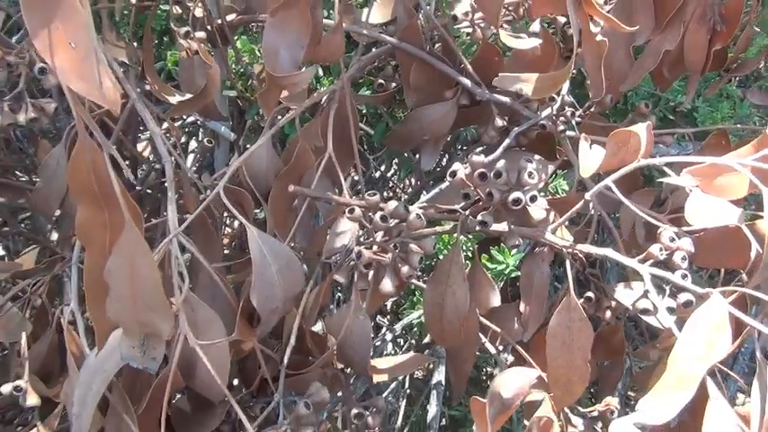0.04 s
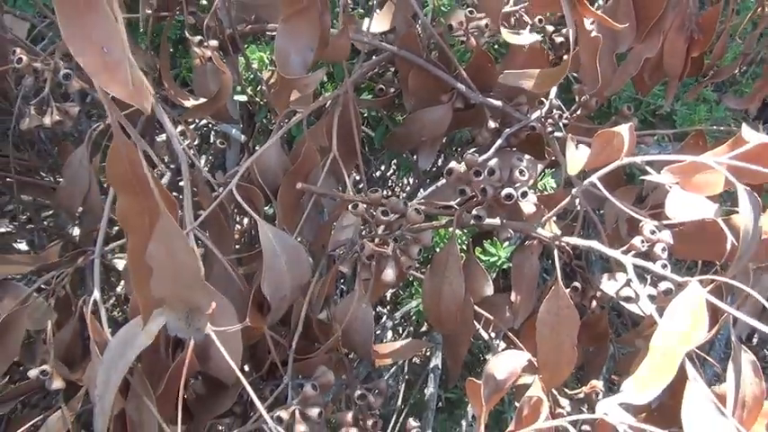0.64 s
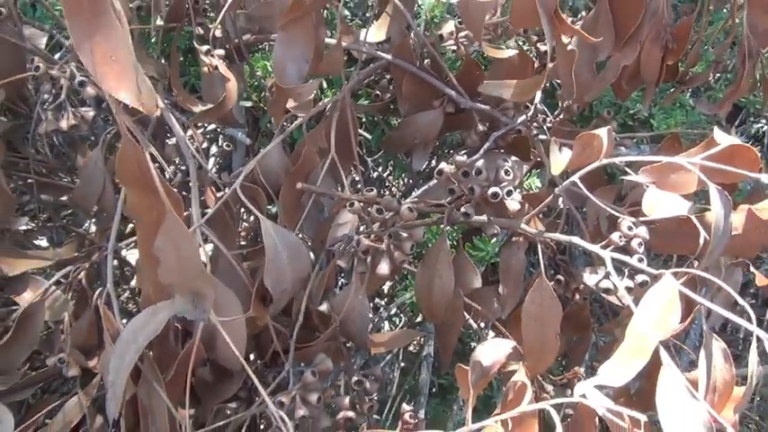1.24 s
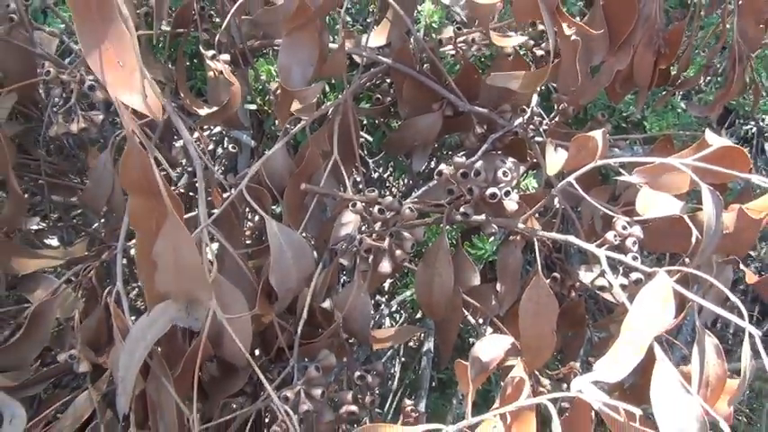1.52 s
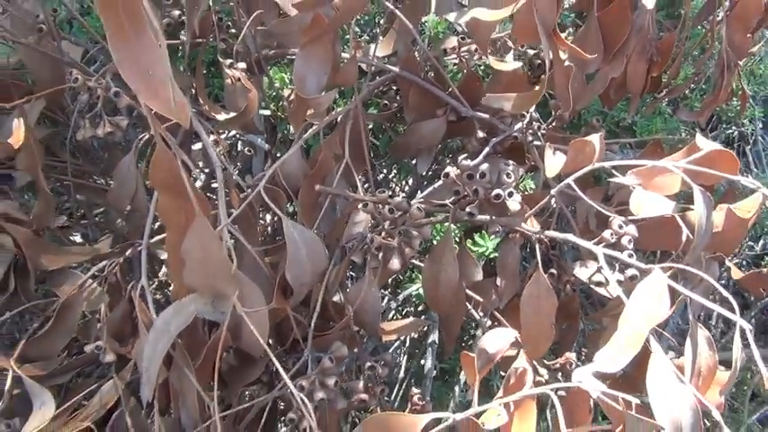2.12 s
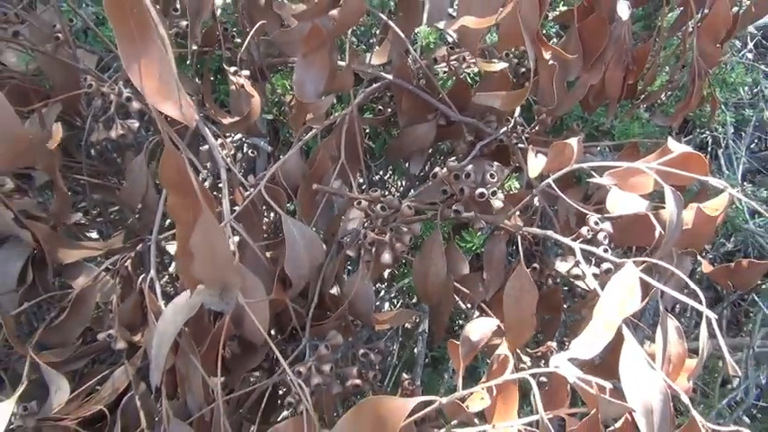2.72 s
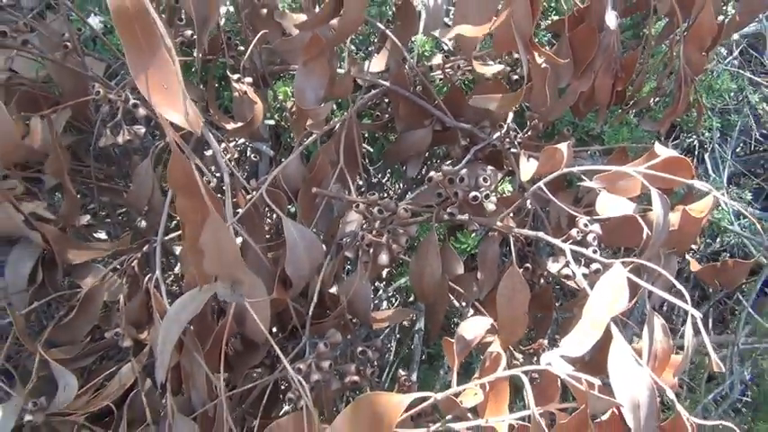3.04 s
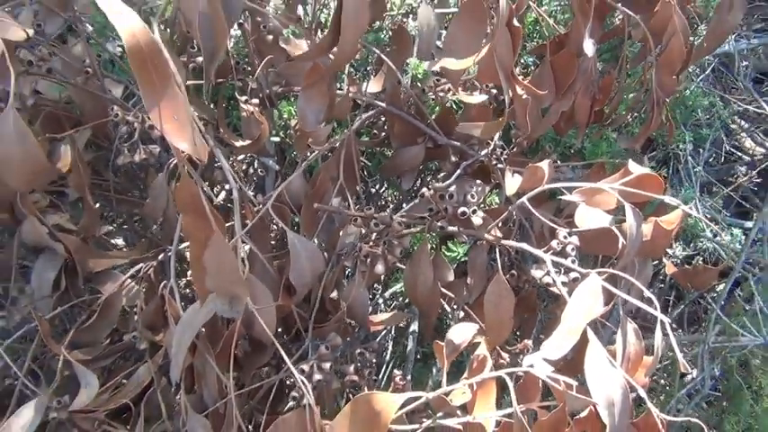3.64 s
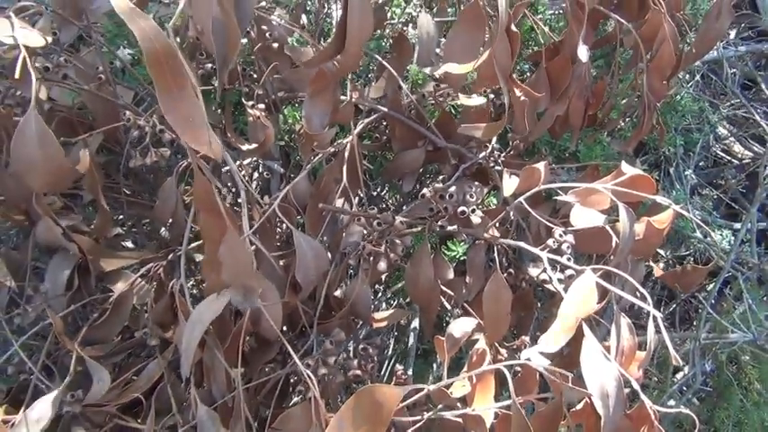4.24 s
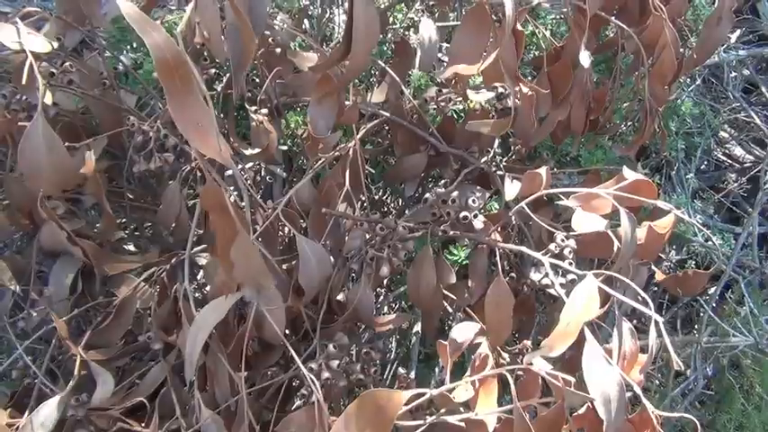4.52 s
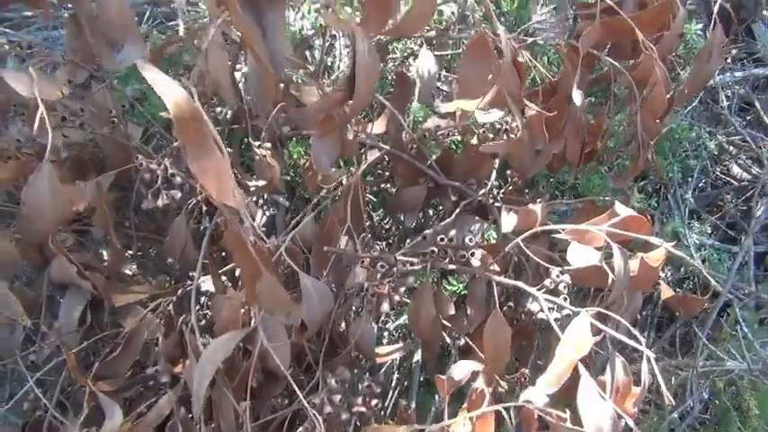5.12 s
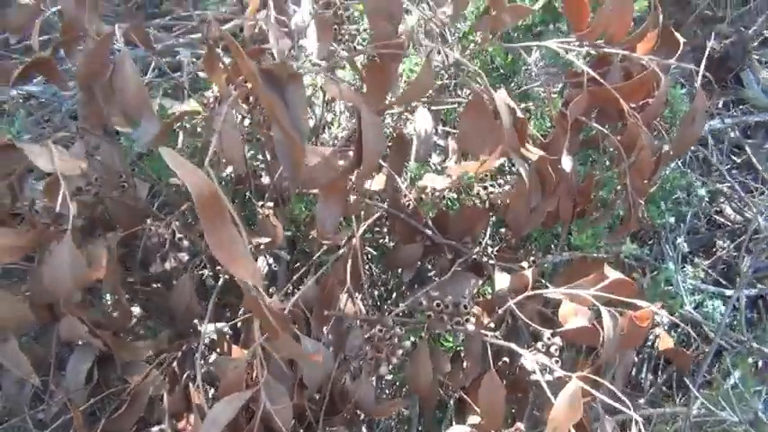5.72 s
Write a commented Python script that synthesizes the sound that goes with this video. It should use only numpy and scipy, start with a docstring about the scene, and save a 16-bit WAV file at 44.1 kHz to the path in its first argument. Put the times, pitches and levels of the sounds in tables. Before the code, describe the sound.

A steady, low distant rush runs throughout, outdoors among trees. Right from the start a bird gives five reedy, slightly raspy whines, nearly three a second, each sliding upward and ending in a quick downward flick. They finish at about 1.7 seconds and ring briefly among the trunks. Other birds answer very faintly from far off, at around 1.3, 2.3 and 3 seconds. Dry leaves tick lightly now and then from 0.7 seconds, with a small crackle near 3.4. Soft, dull bumps on the hand-held microphone cluster between 3 and 4 seconds, with a few more later. From 4 seconds to about 5.8 the bird gives six shorter, higher rising yelps, about three a second, each cracking into a thin whistled squeak. A faint hum comes in at about 5.7 seconds and swells slightly at the very end.

```python
"""Bird calling over leaf litter

A bird in the trees gives five reedy, rising whines, pauses, then six yelps that break up into a squeak.
Trunks and foliage scatter the calls; other birds answer faintly from far off. Dry leaves tick,
the hand-held microphone bumps softly, and a faint hum sets in late over a steady distant rush."""
import sys
import numpy as np
from scipy import signal
from scipy.fft import rfft, irfft
from scipy.io import wavfile
from scipy.ndimage import uniform_filter1d

SR = 44100
rng = np.random.default_rng(int(sys.argv[2]) if len(sys.argv) > 2 else 0)


def transcribe(u):
    """Save the signal u as a 16-bit wav file named by the first command-line argument.

    u: samples, shape (n,) or (channels, n), limited to [-1, 1]; the rate is SR.
    q: integer samples, one column per channel.
    """
    v = np.clip(np.atleast_2d(u).T, -1, 1)
    q = np.round(v * 32767).astype(np.int16)
    wavfile.write(sys.argv[1], SR, q)


N = 262836
TIME = np.arange(N) / SR

# Low register. Each row: start and time to the top in seconds, shelf and top pitch in Hz, time to the
# steepest climb and its half width in seconds, then in dB the drive of the fundamental, second harmonic
# and higher harmonics, and the swell over the climb.
WHINE_NOTES = [(0.0, 0.17, 1451, 2195, 0.099, 0.05, -35.5, -24, -28.5, 6.5),
               (0.363, .168, 1492, 2140, 0.098, 0.04, -32, -30.5, -33.5, 4.5),
               (0.73, .174, 1474, 2160, 0.1, 0.052, -30.5, -27.5, -29.5, 5.5),
               (1.113, .177, 1486, 2124, .095, .044, -32.5, -29, -32, 3.5),
               (1.527, .16, 1348, 2084, .083, .054, -33.5, -30, -37.5, 15)]
# Middle register. Each row: start in seconds, start and top pitch in Hz, time to the steepest climb and
# its half width in seconds, then drive, swell and overtone offset in dB.
YELP_NOTES = [(4.036, 2123, 2794, .005, 0.047, -32.5, -6, -18),
              (4.329, 2214, 2900, 0.023, 0.03, -33, -0.5, -17),
              (4.62, 2200, 2942, 0.028, 0.032, -32.5, -2, -17.5),
              (4.973, 2460, 3340, 0.042, 0.024, -32.5, -0.5, -9.5),
              (5.314, 2407, 3460, .045, 0.0313, -30.5, -1.5, -13),
              (5.696, 2385, 3177, 0.034, 0.015, -34.5, 7, -14)]
# Top register, one per yelp. Each row: start and length in seconds, start and end pitch in Hz,
# mid-note level and swell in dB.
SQUEAK_NOTES = [(4.075, 0.018, 4130, 4620, -33.5, -10), (4.393, 0.05, 4107, 4550, -28, -5),
                (4.712, 0.066, 4320, 4950, -24, -2.5), (5.076, 0.031, 4534, 4830, -24, 1),
                (5.42, 0.024, 4833, 4967, -23.5, -6), (5.785, 0.038, 4580, 4760, -29.5, -8)]
# Throat resonances that a whine's harmonics sweep through. Each row: frequency in Hz, gain in dB.
WHINE_THROAT_EQ = [(1300, -5), (1520, -10), (1700, -6.5), (2120, -3), (2600, -2.5), (3050, -10),
                   (3400, -14.5), (3850, -5.5), (4280, -2), (4500, -8), (5000, 1), (5500, -10.5),
                   (6050, -19.5), (6500, -18.5), (7300, -9), (8050, -21.5), (8600, -20.5)]
# Peaks and dips a yelp sweeps through, from the voice and the ground reflection.
# Each row: frequency in Hz, gain in dB.
YELP_COLOUR_EQ = [(2200, -4.5), (2450, 0.5), (2600, -11), (2830, 3.5), (3020, -4), (3250, 2), (4400, -1),
                  (4800, 5), (5150, 2), (5550, -4), (6150, 3), (6900, -3.5)]
# How the beak radiates the upper overtones. Each row: frequency in Hz, gain in dB.
BEAK_EQ = [(5000, 14), (7300, -3), (8600, -1), (9400, -8), (10100, -5.5), (11600, -3), (13000, -12),
           (15500, -20)]
# Far yelps. Each row: start and length in seconds, start and top pitch in Hz, drive of the fundamental
# and second harmonic in dB.
FAR_YELP_NOTES = [(2.305, .055, 2580, 2950, -60, -58.5), (2.945, .062, 2260, 2980, -54.5, -55)]
# Another bird's husky, falling notes. Each row: start and length in seconds, start and end pitch in Hz,
# drive in dB.
FAR_CHIRP_NOTES = [(1.321, .048, 1817, 1627, -39.5), (3.025, 0.02, 2300, 2170, -45.5),
                   (3.055, 0.0556, 1875, 1584, -47)]
# First reflections off the ground and near branches. Each row: delay in seconds, gain in dB.
EARLY_ECHOES = [(.0045, -38), (.011, -13)]
# Dry leaves ticking. Each row: start in seconds, dry peak in dB, low and high band edge in Hz.
LEAF_TICKS = [(0.717, -38, 3026, 12940), (1.402, -39, 3000, 11960), (1.631, -32, 4040, 11250),
              (2.273, -36, 5000, 12000), (2.279, -29.5, 5900, 9600), (2.387, -36.5, 3000, 9500),
              (2.94, -41, 2200, 4800), (3.4215, -35, 7070, 12500), (3.4445, -33, 1780, 9300),
              (3.4517, -26, 1800, 7500)]
# Leaves brushing. Each row: centre and half width in seconds, dry level in dB, low band edge in Hz.
LEAF_BRUSHES = [(0.72, 0.009, -53, 3980), (0.792, 0.0069, -40, 790), (2.279, 0.0051, -48, 3180),
                (3.401, 0.0065, -50, 1780), (3.437, 0.019, -46.5, 700)]
# The hand nudging the microphone. Each row: start in seconds, strength in dB, pitch in Hz.
HAND_BUMPS = [(3.109, -51, 110), (3.214, -46, 100), (3.255, -46, 90), (3.325, -43, 140), (3.429, -38, 161),
              (3.452, -47, 96), (3.666, -48, 90), (3.822, -42, 115), (3.842, -39, 170), (3.904, -44, 106.6),
              (4.446, -45, 129), (5.06, -45, 111), (5.737, -45, 98)]
# Tone colour of the distant rush. Each row: frequency in Hz, relative gain in dB.
RUSH_EQ = [(15, -60), (28, -33), (70, -13), (165, -9.5), (340, -5.5), (500, -5), (950, -3.5), (1250, -6.5),
           (1500, -7), (3500, -11.5), (6700, -17.5), (10000, -23.5), (14000, -26), (15600, -33)]
# Droning bands within the rush. Each row: centre and width in Hz, level in dB.
DRONE_BANDS = [(346.8, 4.6, -70), (630, 57, -61), (918, 50, -60), (1214, 38, -57.5)]

BREAK_GAP_S = .0008  # the voice stops this long between yelp and squeak


def whine(s, top_s, shelf_hz, top_hz, steep_s, width_s, first_db, second_db, higher_db, swell_db):
    """Scoop, shelf, climb and a downward flick; each harmonic flares as it crosses a throat resonance."""
    scoop_depth, overshoot_s, settle_s = .174, .03, .013
    flick_s, flick_drop, flick_fade_db = .019, .477, -15
    overtone_db, tilt_db, brighten_db = -22, 2.3, 11.5
    t = ages(top_s + flick_s)
    scoop = 1 - scoop_depth * np.exp(-t / settle_s) * np.cos(np.pi * t / overshoot_s)
    climb = rise(t, top_s, steep_s, width_s)
    flick = progress(t - top_s, flick_s) ** 2
    hz = (shelf_hz + (top_hz - shelf_hz) * climb) * scoop * (1 - flick_drop * flick)
    effort = onset(t, length_s=.02, soft_db=-13) + swell_db * (climb - 1) + flick_fade_db * flick
    drives = (first_db, second_db, higher_db, higher_db)
    low = [db + effort + at_hz(WHINE_THROAT_EQ, k * hz) for k, db in enumerate(drives, 1)]
    top = higher_db + overtone_db + effort
    sheen = brighten_db * (climb - 1)  # the top end opens up over the climb
    high = [top + tilt_db * (k - 5) + at_hz(BEAK_EQ, k * hz) + (k > 5) * sheen for k in range(5, 10)]
    rasp = .0035 * (1 + 3.2 * np.sin(np.pi * climb) ** 2)  # roughest in mid-climb
    return note(s, hz, low + high, jitter=rasp, jitter_hz=700, flutter_db=2.17, edge_s=.0026)


def whines():
    """The low register is reedy and a little raspy, with a hiss of air that follows the voice."""
    voice = sum(whine(*row) for row in WHINE_NOTES)
    strength = uniform_filter1d(np.abs(voice), size=500)
    air = rms_one(band(rng.standard_normal(N), 5500, 16600))
    return voice + from_db(-35) * strength * air


def yelp(s, start_hz, top_hz, steep_s, width_s, db, swell_db, overtone_db, break_s):
    """A quick S-shaped rise that sweeps through peaks and dips until the voice breaks."""
    tilt_db = -2.5  # per harmonic
    t = ages(break_s - BREAK_GAP_S - s)
    hz = start_hz + (top_hz - start_hz) * rise(t, t[-1], steep_s, width_s)
    effort = db + onset(t, length_s=.028, soft_db=-15.5) + swell_db * (t / t[-1] - .5)
    low = [effort + at_hz(YELP_COLOUR_EQ, k * hz) for k in (1, 2)]
    high = [effort + overtone_db + tilt_db * (k - 4) + at_hz(BEAK_EQ, k * hz) for k in range(3, 6)]
    return note(s, hz, low + high, jitter=.0037, jitter_hz=500, flutter_db=.94, edge_s=.002)


def squeak(s, length_s, start_hz, end_hz, db, swell_db, overtone_db=-18):
    """A nearly pure whistle that slides upward, faster toward its end."""
    share = progress(ages(length_s), length_s)
    hz = start_hz + (end_hz - start_hz) * share ** 1.32
    effort = db + swell_db * (share - .5)
    high = [effort + overtone_db + at_hz(BEAK_EQ, k * hz) for k in (2, 3)]
    return note(s, hz, [effort] + high, jitter=.001, jitter_hz=400, flutter_db=.5, edge_s=.0019)


def breaking_yelps(crack_db=-9):
    """The voice flips register from each yelp into its squeak with a tiny crack."""
    yelps = sum(yelp(*row, break_s=after[0]) for row, after in zip(YELP_NOTES, SQUEAK_NOTES))
    squeaks = sum(squeak(*row) for row in SQUEAK_NOTES)
    cracks, t = np.zeros(N), TIME[:SR // 100]
    for s, _, _, _, db, _ in SQUEAK_NOTES:
        crack = band(rng.standard_normal(len(t)) * np.exp(-t / .0022), 3900, 10600)
        add(cracks, s - BREAK_GAP_S / 2, from_db(db + crack_db) * crack)
    return yelps + squeaks + cracks


def far_birds():
    """Faint answers, their upper overtones lost on the way."""
    out = np.zeros(N)
    for s, length, start_hz, top_hz, db, octave_db in FAR_YELP_NOTES:
        hz = start_hz + (top_hz - start_hz) * rise(ages(length), length, length / 2, length / 2)
        out += note(s, hz, [db, octave_db], jitter=.016, jitter_hz=400, flutter_db=3.5, edge_s=.0054)
    for s, length, start_hz, end_hz, db in FAR_CHIRP_NOTES:
        hz = start_hz + (end_hz - start_hz) * ages(length) / length
        out += note(s, hz, [db], jitter=.055, jitter_hz=348, flutter_db=3, edge_s=.0025)
    return out


def woods(x, spray_db, spray_s, body_db, treble_db, t60, treble_t60):
    """Two early echoes, a quick spray off the foliage, then a tail from the trunks that dulls as it dies."""
    t = TIME[:SR]
    spray = rng.standard_normal(SR) * t * np.exp(-t / spray_s)
    scatter = rng.standard_normal(SR) * (1 - np.exp(-t / .012))
    body = band(scatter, 600, 6500) * from_db(-60 * t / t60)
    treble = band(scatter, 7500, 14500) * from_db(-60 * t / treble_t60)
    layers = (spray_db, spray), (body_db, body), (treble_db, treble)
    response = sum(from_db(db) * rms_one(layer) for db, layer in layers) / np.sqrt(SR)
    for delay, db in EARLY_ECHOES:
        response[round(delay * SR)] += from_db(db)
    return signal.fftconvolve(x, response)[:N]


def leaves(grain_spread_db=4.5):
    """A dry leaf snaps in a millisecond; brushing is a cloud of tiny snaps."""
    out, t = np.zeros(N), TIME[:SR // 50]
    for s, db, low_hz, high_hz in LEAF_TICKS:
        snap = band(rng.standard_normal(len(t)) * np.exp(-t / .0012), low_hz, high_hz)
        add(out, s, from_db(db) * snap / np.abs(snap).max())
    grains = rng.standard_normal(N) * from_db(grain_spread_db * rng.standard_normal(N))
    for s, width_s, db, low_hz in LEAF_BRUSHES:
        swell = np.exp(-((TIME - s) / width_s) ** 2 / 2)
        out += from_db(db) * swell * rms_one(band(grains, low_hz, 5 * low_hz, order=1))
    return out


def hand_bumps():
    """Each bump rocks the microphone for a cycle or two: a soft, dull thud."""
    out, t = np.zeros(N), TIME[:SR // 10]
    age = t / .0024  # the push peaks at 2.4 ms
    for s, db, hz in HAND_BUMPS:
        add(out, s, from_db(db) * age * np.exp(1 - age) * np.sin(2 * np.pi * hz * t))
    return band(out, 48, 570)


def distant_rush(level_db=-48):
    """A steady bed of dark noise with a few droning bands."""
    hz = np.arange(N // 2 + 1) * SR / N
    spectrum = rfft(rng.standard_normal(N)) * from_db(at_hz(RUSH_EQ, hz))
    drones = sum(from_db(db) * rms_one(resonance(rng.standard_normal(N), centre, width))
                 for centre, width, db in DRONE_BANDS)
    return from_db(level_db) * rms_one(irfft(spectrum, N)) + drones


def hum(start_s=5.735, pitch_hz=606, level_db=-53, octave_db=-24):
    """A faint tone that sets in late, then grows louder and brighter."""
    swell_s, swell_db_per_s, brighten_db_per_s = 5.89, 79, 230
    late = np.maximum(TIME[TIME >= start_s] - swell_s, 0)
    db = level_db + swell_db_per_s * late
    levels = [db, db + octave_db + brighten_db_per_s * late]
    hz = np.full(len(late), pitch_hz)
    return note(start_s, hz, levels, jitter=.0074, jitter_hz=40, flutter_db=1.5, edge_s=.012)


def note(s, hz, levels, jitter, jitter_hz, flutter_db, edge_s):
    """One note at time s, with a level in dB for each harmonic; jitter is a share of the pitch."""
    t = TIME[:len(hz)]
    unsteady_hz = hz * (1 + jitter * wander(SR // 2, jitter_hz)[:len(t)])
    phase = 2 * np.pi * np.cumsum(unsteady_hz) / SR
    voice = sum(from_db(db) * np.sqrt(2) * np.sin(k * phase) for k, db in enumerate(levels, 1))
    gate = progress(np.minimum(t, t[-1] - t), edge_s)
    flutter = from_db(flutter_db * wander(SR // 2, rate_hz=120)[:len(t)])
    track = np.zeros(N)
    add(track, s, voice * gate * flutter)
    return track


def rise(t, length_s, steep_s, width_s):
    """An S-shaped climb from 0 to 1, steepest at steep_s."""
    curve = np.tanh((np.minimum(t, length_s) - steep_s) / width_s)
    return (curve - curve[0]) / (curve[-1] - curve[0])


def onset(t, length_s, soft_db):
    """The voice comes up to strength, from soft_db to 0 dB."""
    return soft_db * (1 - progress(t, length_s))


def progress(t, length_s):
    """A ramp from 0 to 1 that then holds."""
    return np.clip(t / max(length_s, 1e-4), 0, 1)


def ages(length_s):
    """Sample times within a note."""
    return np.arange(0, length_s, 1 / SR)


def wander(size, rate_hz):
    """Smooth random modulation with rms 1."""
    return rms_one(signal.sosfilt(signal.butter(2, rate_hz, fs=SR, output="sos"), rng.standard_normal(size)))


def band(x, low_hz, high_hz, order=2):
    """Band-pass."""
    edges_hz = [low_hz, min(high_hz, SR / 2 - 1000)]
    return signal.sosfilt(signal.butter(order, edges_hz, "band", fs=SR, output="sos"), x)


def resonance(x, hz, width_hz):
    """Two-pole resonance with gain 1 at its peak."""
    r = np.exp(-np.pi * width_hz / SR)
    feedback = [1, -2 * r * np.cos(2 * np.pi * hz / SR), r * r]
    return signal.lfilter(np.array([1, 0, -1]) * (1 - r * r) / 2, feedback, x)


def at_hz(points, hz):
    """Read an EQ curve in dB on a log-frequency axis."""
    known_hz, db = np.transpose(points)
    return np.interp(np.log(np.maximum(hz, 1)), np.log(known_hz), db)


def from_db(db):
    """Decibels to gain."""
    return 10 ** (np.asarray(db) / 20)


def rms_one(x):
    """Scale to rms 1."""
    return x / np.sqrt(np.mean(x ** 2) + 1e-20)


def add(out, s, sound):
    """Mix a sound in at time s."""
    start = max(round(s * SR), 0)
    out[start:start + len(sound)] += sound[:N - start]


def scene():
    """Mono mix: whines ring longer and brighter than yelps and leaves; the far birds are wettest."""
    low, high, far = whines(), breaking_yelps() + leaves(), far_birds()
    low += woods(low, spray_db=-11.5, spray_s=.037, body_db=-14.5, treble_db=-7.5,
                 t60=.87, treble_t60=.47)
    high += woods(high, spray_db=-11.5, spray_s=.0078, body_db=-14, treble_db=-13.5,
                  t60=.64, treble_t60=.24)
    far_echo = woods(far, spray_db=-9, spray_s=.013, body_db=-12, treble_db=-20, t60=1, treble_t60=.42)
    return (low + high + from_db(-1.5) * far + far_echo + hand_bumps() + distant_rush() + hum())[None]


def record(dry):
    """A steep low-pass trims the very top."""
    cutoff_hz = 15750
    return signal.sosfilt(signal.ellip(12, .1, 90, cutoff_hz, fs=SR, output="sos"), dry)


dry = scene()
out = record(dry)
transcribe(out)
```